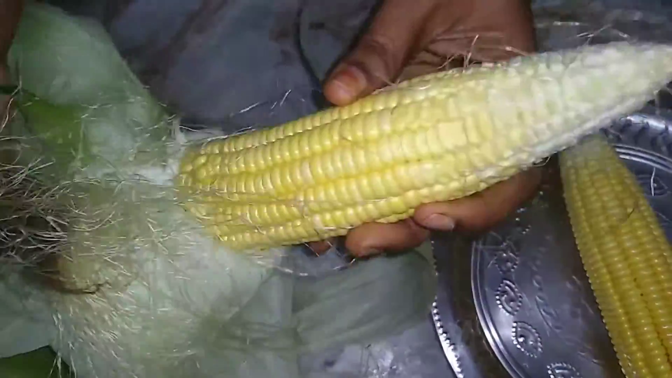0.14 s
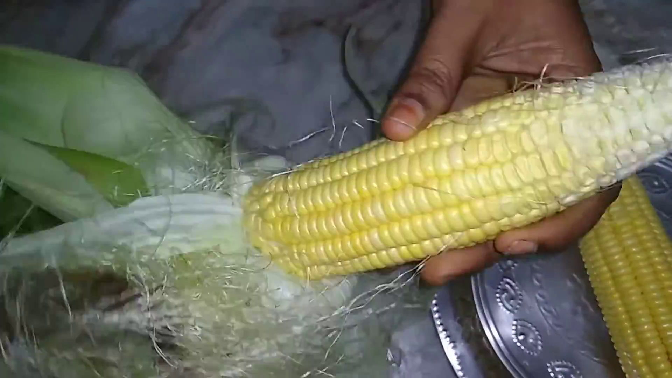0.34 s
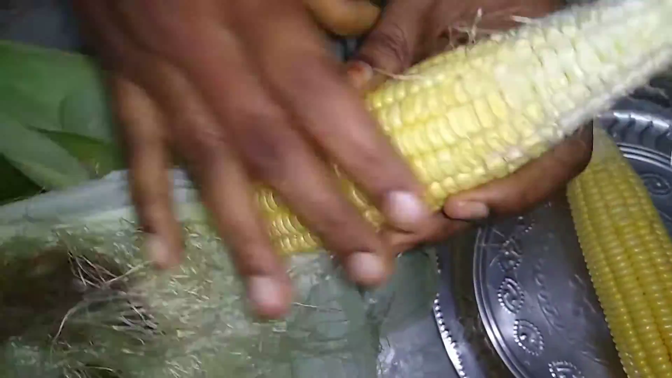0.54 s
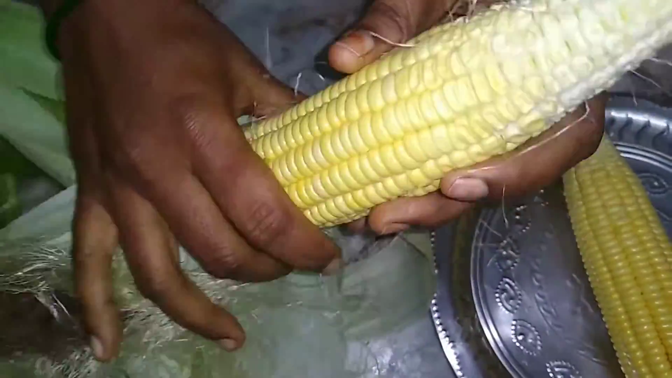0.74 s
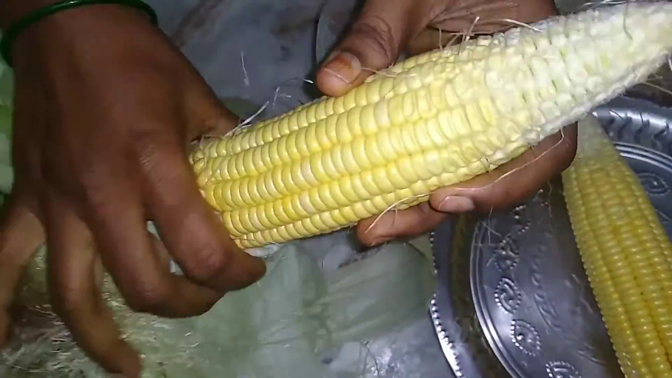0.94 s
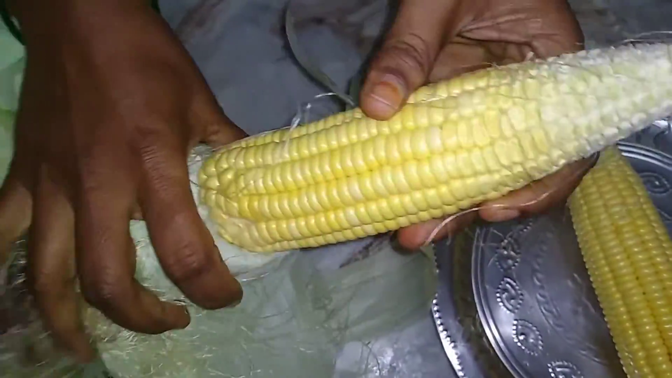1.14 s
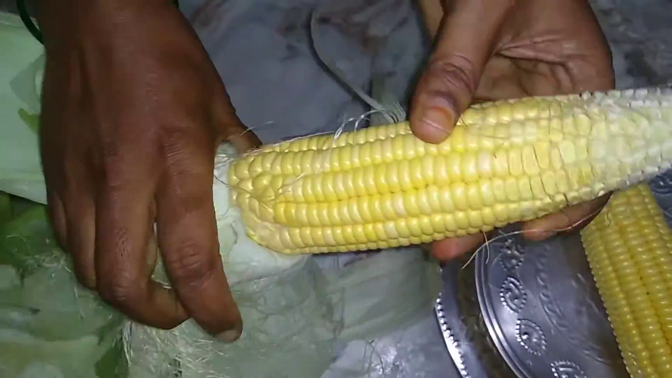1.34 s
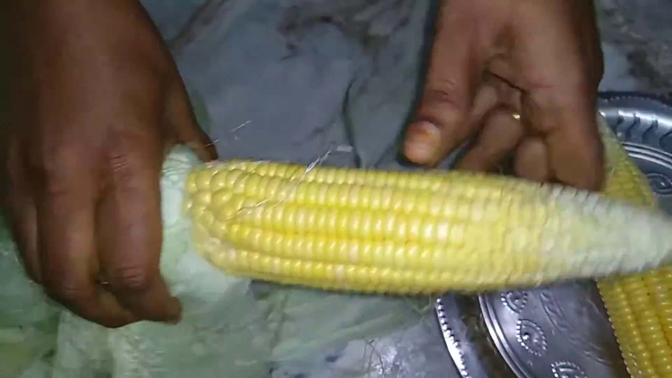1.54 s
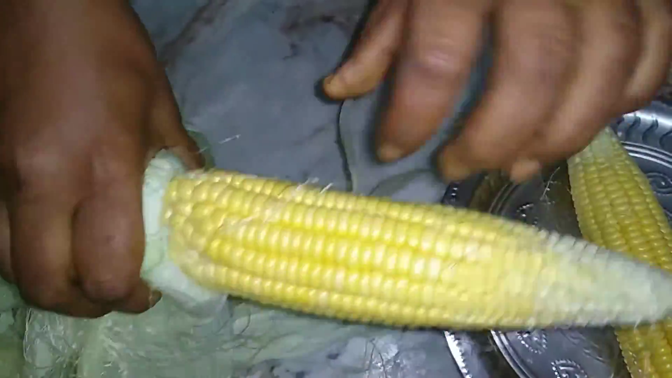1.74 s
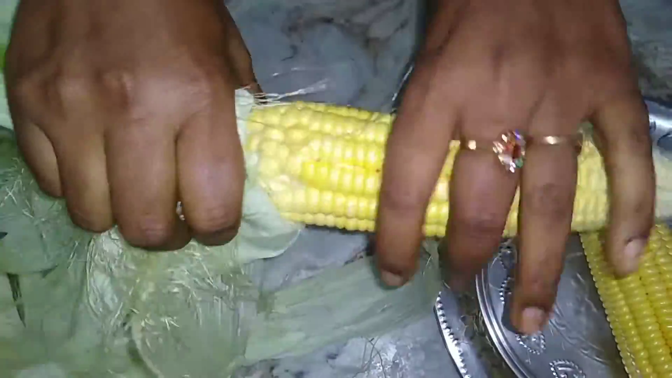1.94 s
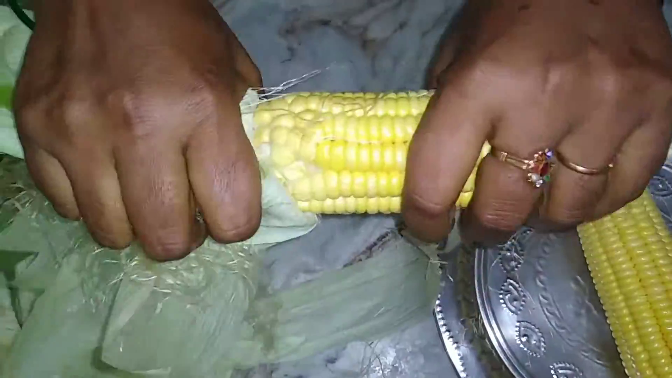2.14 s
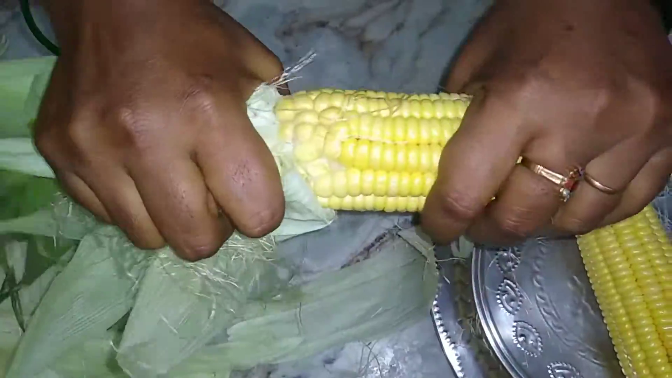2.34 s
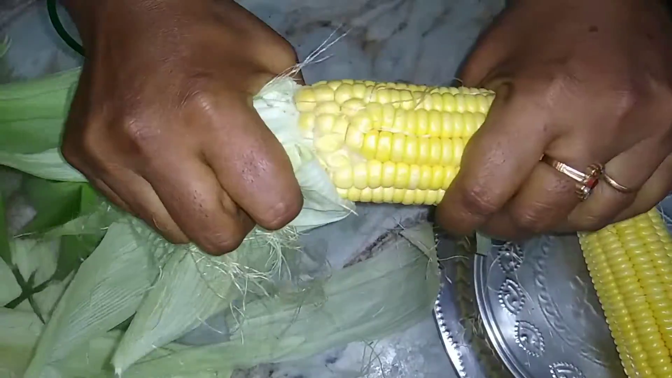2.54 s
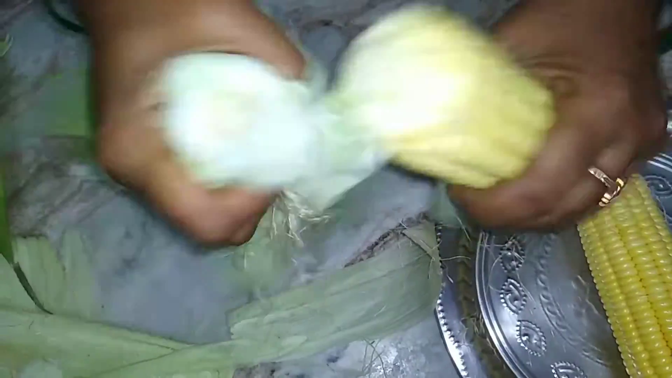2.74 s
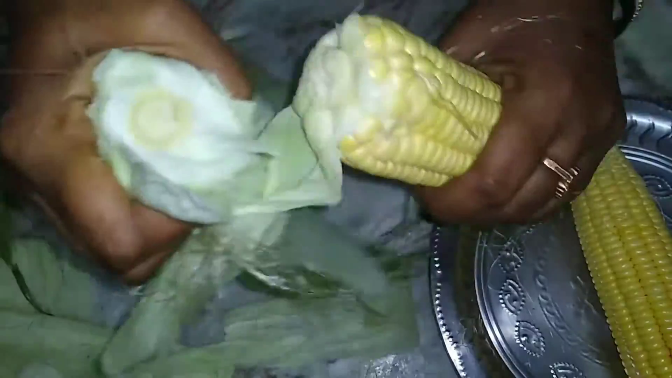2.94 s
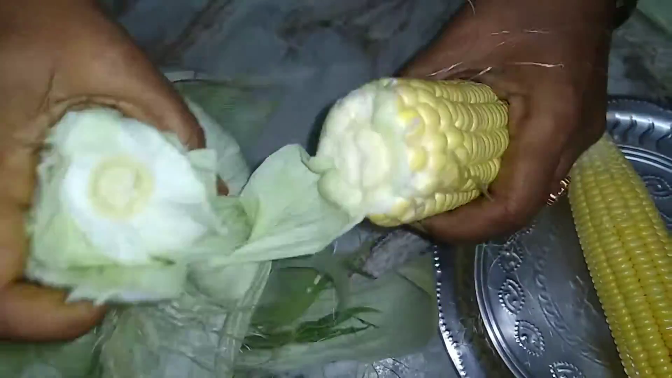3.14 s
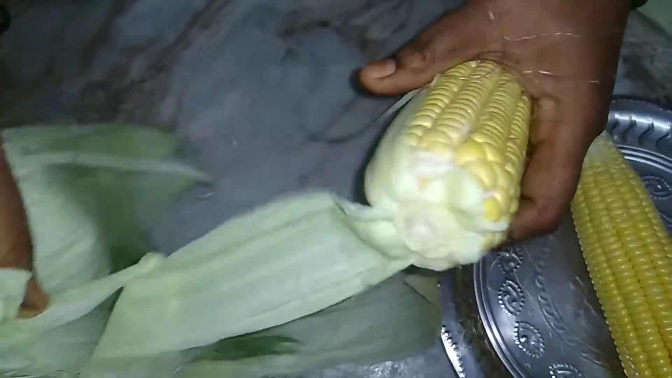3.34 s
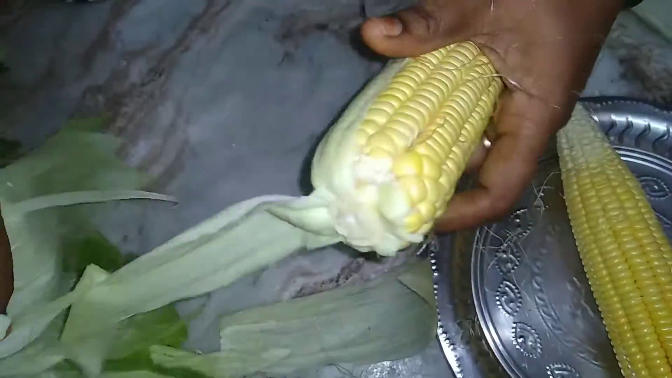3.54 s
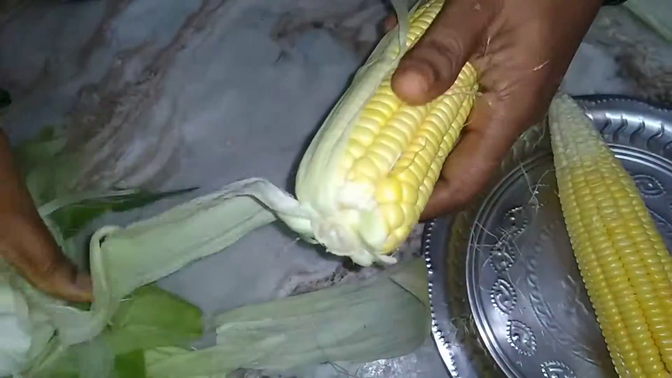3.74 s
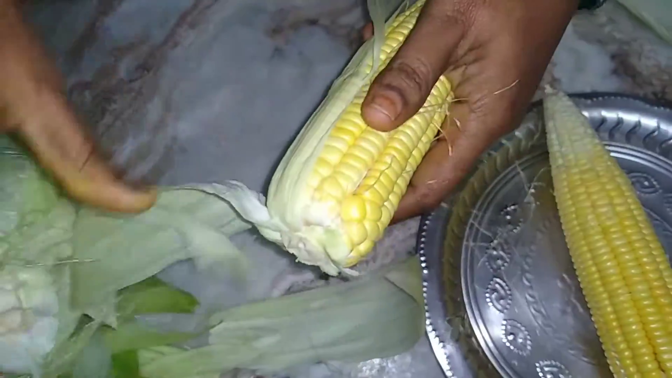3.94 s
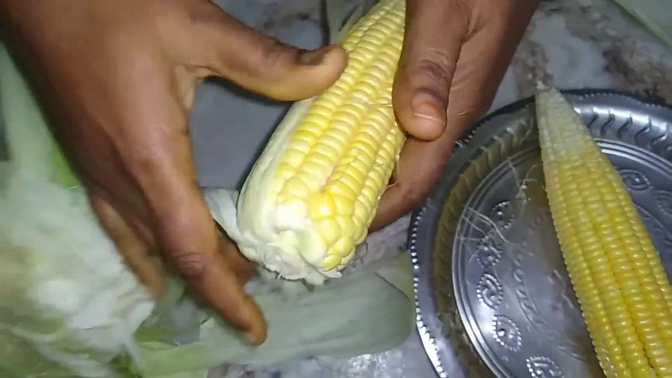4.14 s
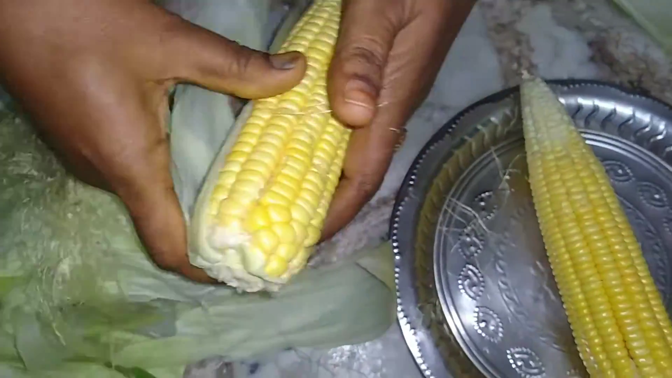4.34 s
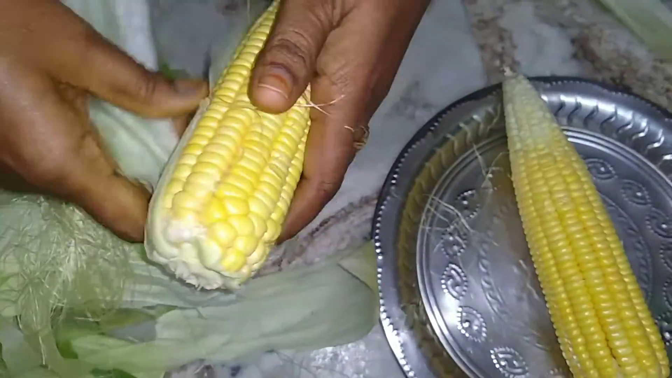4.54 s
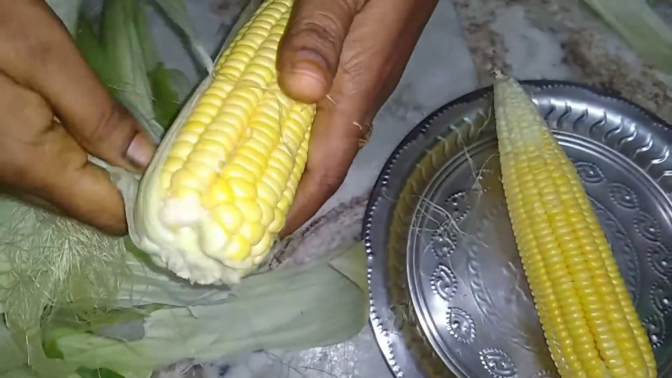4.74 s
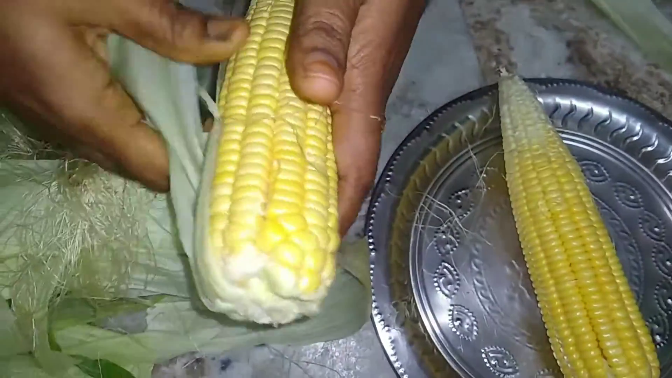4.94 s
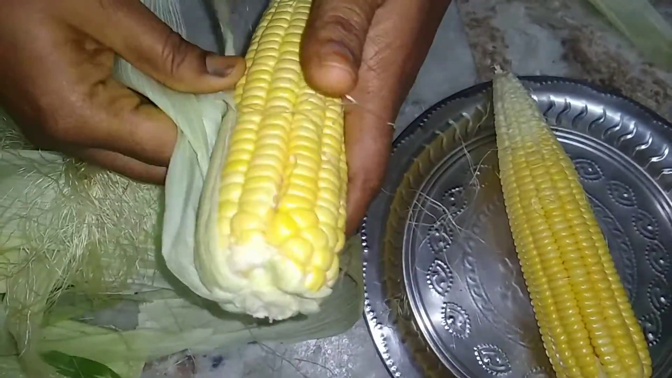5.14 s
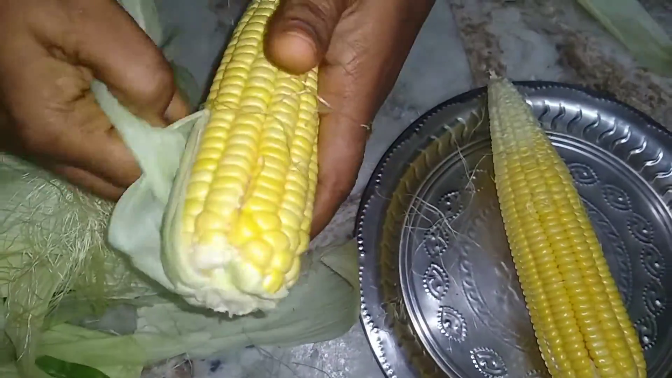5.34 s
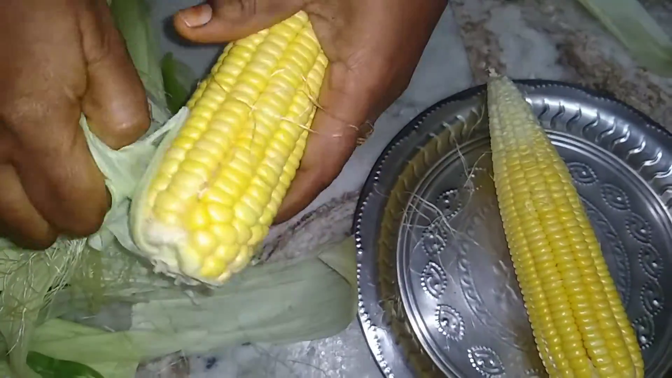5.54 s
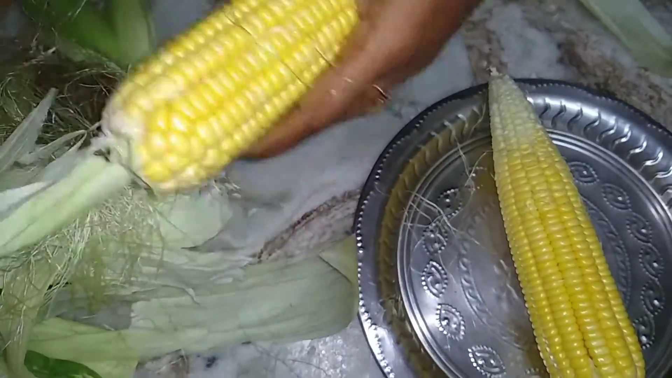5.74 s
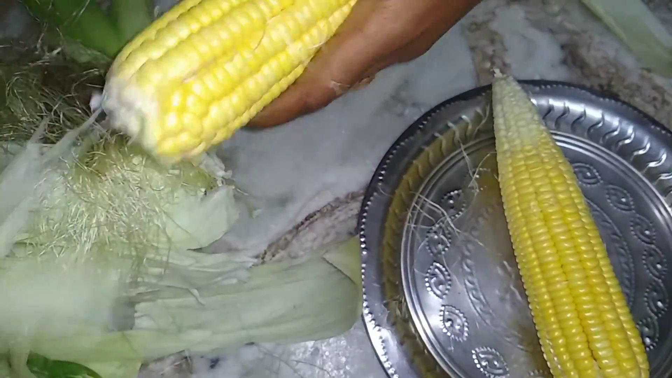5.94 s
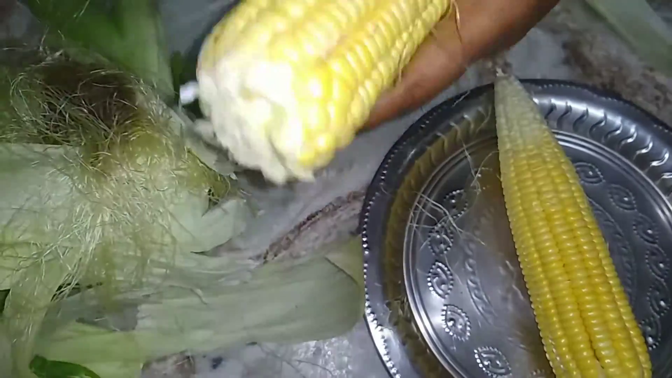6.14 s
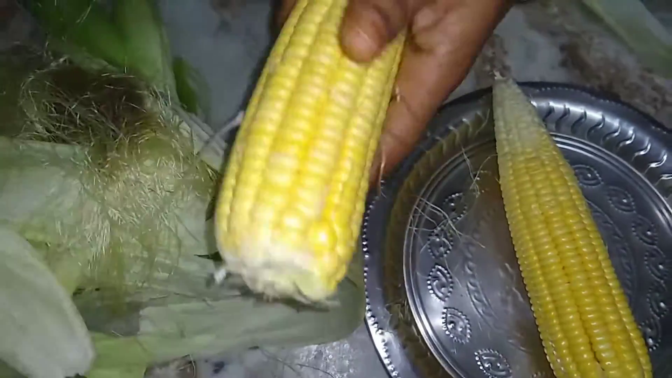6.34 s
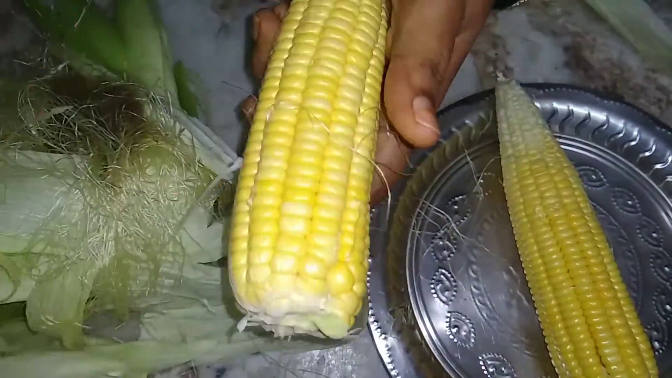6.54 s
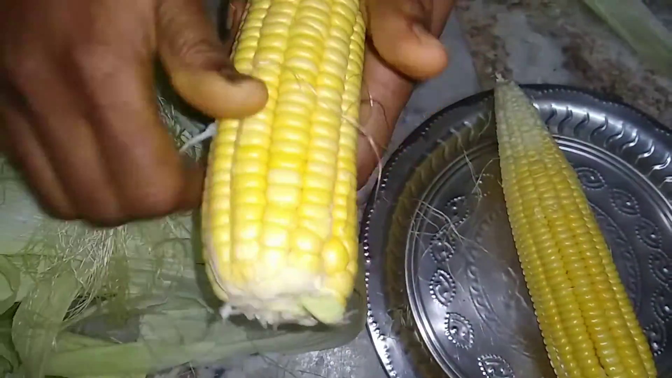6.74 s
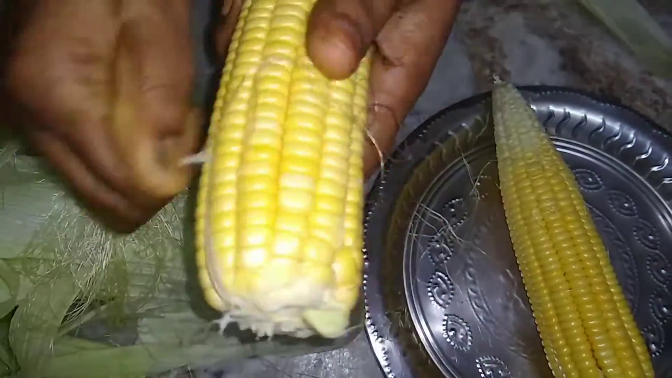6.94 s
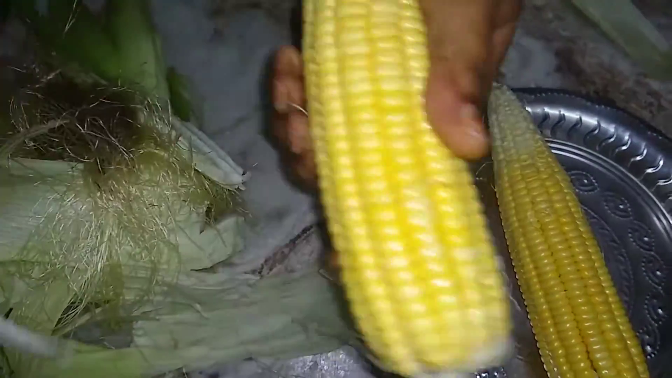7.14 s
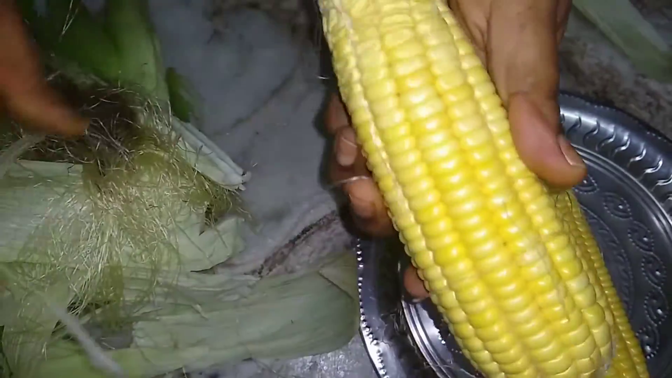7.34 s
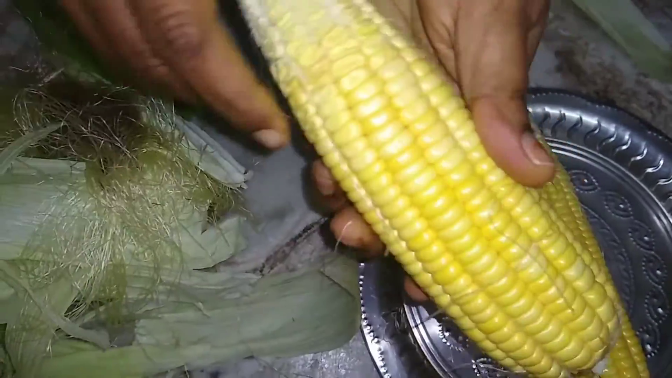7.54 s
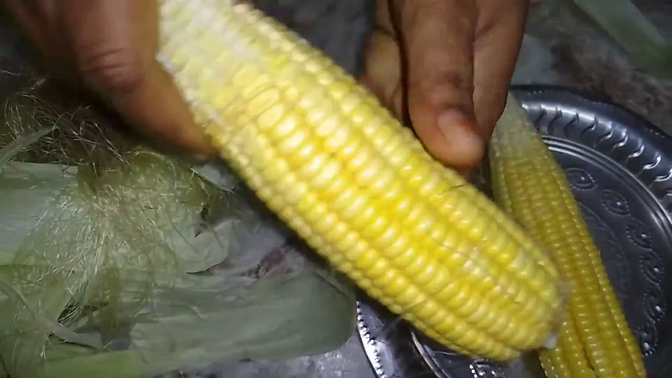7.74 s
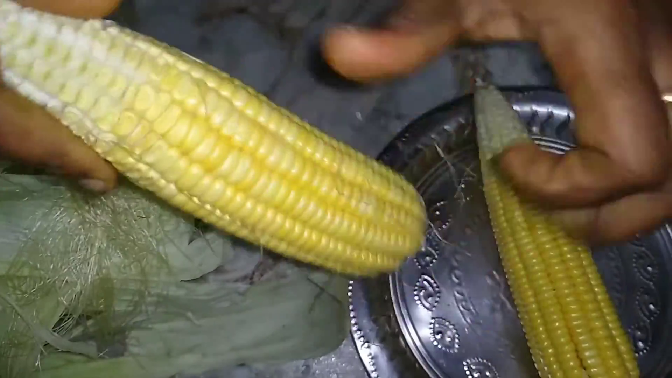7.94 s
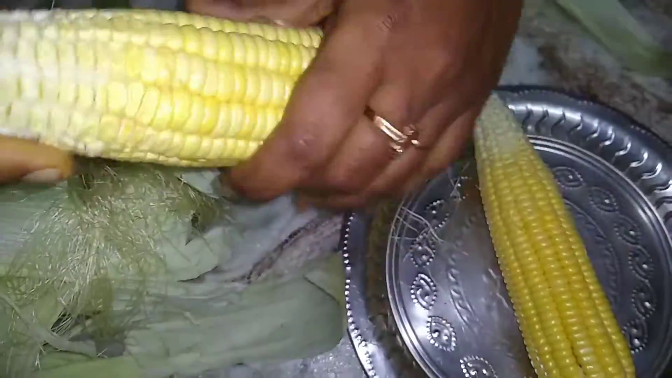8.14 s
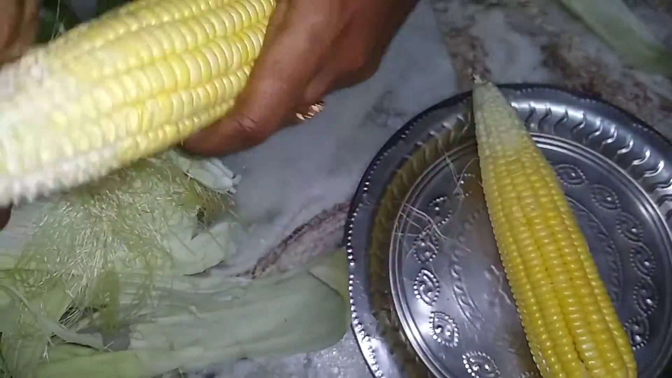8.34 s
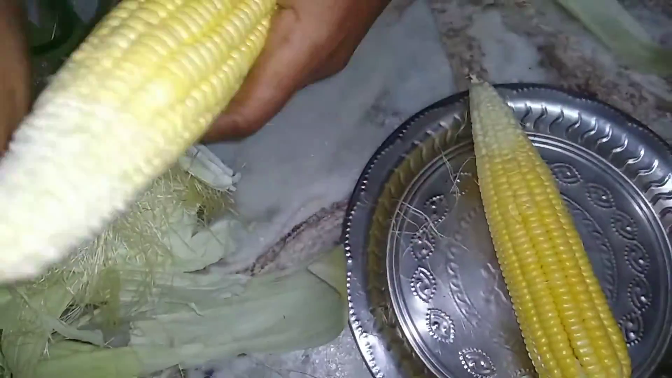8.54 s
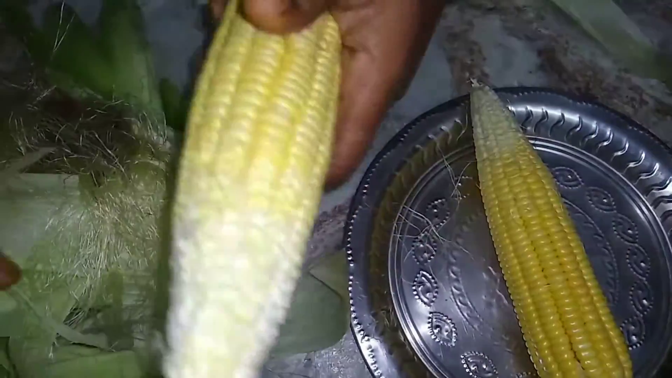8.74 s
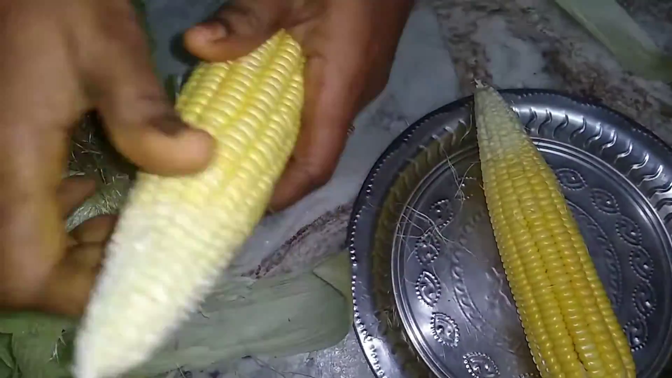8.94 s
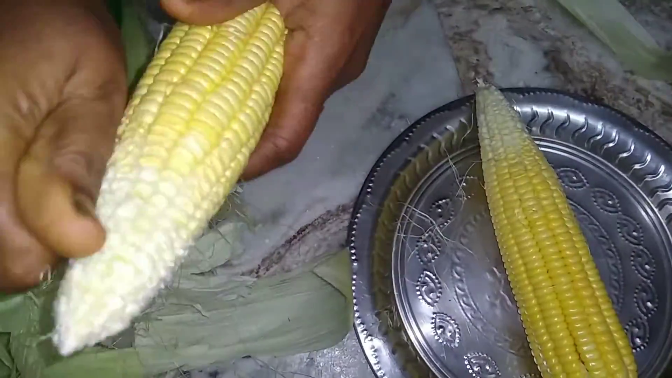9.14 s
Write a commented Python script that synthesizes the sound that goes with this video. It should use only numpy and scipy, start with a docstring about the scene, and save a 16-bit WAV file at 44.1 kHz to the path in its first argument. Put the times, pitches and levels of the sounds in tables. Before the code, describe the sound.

A close, wide stereo recording in a small kitchen with short reflections. It opens with a crisp husk tug at 0 s, then light rustling; faint thin whistles drift from far off around 0.6-0.9 s. At 0.7-1.3 s fibres snap, leaves tug and skin skids with a short hiss. Small snaps follow near 2.0 and 2.5 s, a first crack at 2.6, and the loudest event, a hard stalk crack, at 2.75. Leaf tearing swells around 3.2-3.4, with sharp snaps at 3.55. Handling is soft until about 5.4, when a tiny wet squeak leads into ripping and cracking from 5.6 to 6.0. Afterwards there are only sparse ticks, a faint skid at 7.7 and light rustles at 8.3 and 9.1. Throughout, muffled room air and a distant small engine hum low, the engine slowing from about 4 to 5.8 s, then picking up again; both swell with the rustles.

```python
"""A kitchen counter: hands peel a fresh ear of corn. Husks rustle, rip and squeak (grains and
single breaks through three noise bands, slips as harmonics), the stalk breaks off with a loud crack
and the last leaf is torn away (fractures ringing through resonances).
Far outside a small engine, built from its firing orders, slows and picks up again; a two-port
recorder holds everything down between rustles and widens the stereo picture."""
import sys
import numpy as np
from scipy import signal
from scipy.fft import rfft, irfft, next_fast_len
from scipy.io import wavfile
from scipy.ndimage import uniform_filter1d

SR = 44100
rng = np.random.default_rng(int(sys.argv[2]) if len(sys.argv) > 2 else 0)


def put_to_file(sound):
    """Save the sound as 16-bit audio at rate SR, in the file named by the first command-line argument."""
    columns = np.atleast_2d(sound).T  # one column per channel
    safe = np.clip(columns, -1, 1)
    whole_steps = np.round(safe * 32767)
    wavfile.write(sys.argv[1], SR, whole_steps.astype(np.int16))


N = 409248
TIME = np.arange(N) / SR
HALF_SECOND = TIME[:SR // 2]
# In all tables level_db is relative: trims, room and recorder come after it.


def from_db(db):
    """Decibels to gain."""
    return 10 ** (np.asarray(db) / 20)


def rms_one(x):
    """Scale to rms 1."""
    return x / np.sqrt(np.mean(x ** 2) + 1e-20)


def curve(rows):
    """Draw straight lines through (time, value) points, at every sample."""
    start_s, values = np.transpose(rows)
    return np.interp(TIME, start_s, values)


def at_hz(points, hz):
    """Gain of a spectrum at the given frequencies, interpolated over log frequency."""
    freqs, db = np.transpose(points)
    return from_db(np.interp(np.log(np.maximum(hz, 1)), np.log(freqs), db))


def coloured(x, points):
    """Give a sound a smooth spectrum."""
    length = x.shape[-1]
    size = next_fast_len(length)
    gains = at_hz(points, np.fft.rfftfreq(size, 1 / SR))
    return irfft(rfft(x, size) * gains, size)[..., :length]


def drift(rate, size):
    """Slow chance around zero with unit-spread targets, rate new targets per second."""
    steps = np.arange(size) / SR * rate
    return np.interp(steps, np.arange(4096), rng.standard_normal(4096))


def add(track, s, sound):
    """Mix a sound in at time s."""
    start = max(round(s * SR), 0)
    track[start:start + len(sound)] += sound[:N - start]


def band(x, edges):
    """Causal band-pass."""
    sos = signal.butter(2, np.clip(edges, 20, .47 * SR), "band", fs=SR, output="sos")
    return signal.sosfilt(sos, x + 1e-18)


def resonate(x, modes):
    """Parallel two-pole resonances with alternating signs; a wider mode dies faster."""
    out = 0
    for k, (hz, width_hz, db) in enumerate(modes):
        r = np.exp(-np.pi * width_hz / SR)
        poles = [1, -2 * r * np.cos(2 * np.pi * hz / SR), r * r]
        ringing = (1 - r * r) / 2 * signal.lfilter([1, 0, -1], poles, x + 1e-18)
        out = out + (-1) ** k * from_db(db) * ringing
    return out


def gesture(rise, hold, fade):
    """Envelope that swells, holds, then dies by 40 dB over the fade."""
    t = HALF_SECOND
    swell = np.minimum(t / max(rise, 1e-4), 1) ** 2
    return swell * from_db(-40 * np.maximum(t - rise - hold, 0) / max(fade, 1e-3))


def grains(per_s, spread_db, friction):
    """Half a second of tiny fibre breaks, mostly small and a few large, over smooth friction."""
    size = SR // 2
    born = rng.random(size) < per_s / SR
    heights = from_db(spread_db * np.minimum(rng.exponential(1, size), 4))
    breaks = born * heights * rng.choice([-1, 1], size)
    return rms_one(breaks) + friction * rng.standard_normal(size)


def fracture(splinter_s, splinters):
    """One sharp release, followed by splinter noise that dies by 40 dB in splinter_s."""
    t = TIME[:SR // 20]
    after = rng.standard_normal(len(t)) * from_db(-40 * t / max(splinter_s, 1e-4))
    return (t == 0) + splinters * after / np.linalg.norm(after)


# the three ranges of a husk: low and high edge
DULL_HZ, CRISP_HZ, FINE_HZ = (600, 1780), (2360, 4670), (7900, 18400)


def husk(force, dull_db, fine_db):
    """A leaf radiates in three ranges: dull flap, crisp ribs and fine fibres."""
    thud = rms_one(band(force, (230, 600)))  # soft thud of the hand
    flap = rms_one(band(force, DULL_HZ)) + from_db(-18.5) * thud
    ribs = rms_one(band(force, CRISP_HZ))
    fibres = rms_one(band(force, FINE_HZ))
    return ribs + from_db(dull_db) * flap + from_db(fine_db) * fibres


def rustle(envelope, grain_db, dull_db, fine_db):
    """Fibres tear in uneven clumps."""
    clumps = from_db(3.9 * drift(170, size=SR // 2))
    force = grains(per_s=2200, spread_db=grain_db, friction=0.95) * clumps
    return envelope * husk(force, dull_db, fine_db)


def diffuse(size, shared_below_hz):
    """Noise from all sides at two close ports: alike in the bass, unrelated in the treble."""
    common, apart = rng.standard_normal((2, size))
    high_pass = signal.butter(1, shared_below_hz, "high", fs=SR, output="sos")
    apart = signal.sosfilt(high_pass, apart)
    return rms_one(common + apart * np.array([[1], [-1]]))


# colour of the air: pitch_hz, density_db (dB per Hz, relative)
AIR_COLOUR = [(30, -19), (70, 12.5), (150, 2), (400, 3.5), (1100, -4), (1800, -5.5), (3200, -7),
              (5000, -14), (7000, -24.5), (11000, -26), (15500, -21)]
# slow swells of the air: start_s, level_db
AIR_SWELL = [(0, -50.5), (1.3, -49), (2.5, -50), (3.7, -47.5), (5, -50), (6.3, -51), (9.28, -51.5)]


def room_air():
    """Steady diffuse noise around both ports, slowly rising and falling."""
    noise = rms_one(coloured(diffuse(size=N, shared_below_hz=900), AIR_COLOUR))
    return from_db(curve(AIR_SWELL) - 2.07) * noise


# faint far whistles: start_s, length_s, first_hz, last_hz, level_db
FAR_WHISTLES = [(.55, 0.053, 485, 514, -50), (0.591, 0.18, 571, 568, -53), (0.779, 0.13, 715, 698, -56),
                (8.599, .22, 1305, 1350, -61)]


def whistles(waver, rise_s, fade_s):
    """Thin gliding sine tones from far away."""
    out, t = np.zeros(N), HALF_SECOND
    for s, length, first_hz, last_hz, db in FAR_WHISTLES:
        glide = np.interp(t, [0, length], [first_hz, last_hz])
        hz = glide * (1 + waver * drift(120, size=len(t)))
        tone = np.sin(2 * np.pi * np.cumsum(hz) / SR)
        add(out, s, from_db(db) * gesture(rise_s, length - rise_s, fade_s) * tone)
    return out


# engine speed: start_s, rate_hz (firings per second)
FIRING_RATE = [(0, 29.6), (2.9, 31.4), (3.3, 30), (4.0, 33), (4.5, 24.6), (5.8, 20.3), (7.0, 29.4),
               (7.5, 31.7), (9.28, 32.6)]
# exhaust: start_s, level_db
EXHAUST_LEVEL = [(0, -64.5), (2.6, -65), (3.35, -42), (3.85, -55.5), (4.05, -43.5), (5.7, -54),
                 (6.6, -49.5), (7.1, -49.5), (7.55, -48), (7.85, -57.5), (8.35, -48), (9.28, -58)]
# exhaust as the house passes it on, booming at one room mode: pitch_hz, gain_db
EXHAUST_COLOUR = [(85, -2), (100, -1), (120, -6), (130, -7), (145, -11), (160, 5.5), (178, -6.5), (215, -9),
                  (275, -18.5), (320, -31), (390, -12.5), (450, -22.5)]
# deep hum: start_s, level_db
DEEP_HUM_LEVEL = [(0, -57), (1.4, -58.5), (1.75, -41), (2.2, -50.5), (3.25, -38.5), (3.7, -50.5),
                  (7.2, -47.5), (9.28, -61)]
# the deepest room mode, which the second order sweeps through
HUM_MODE_HZ, HUM_WIDTH_HZ = 60, 12
# slowing by this many firings per s each second, the upper orders lose this much
COAST_SAG_PER_S, COAST_LOSS_DB = 4, 8.5


def engine(level_db, whine_db, waver_db):
    """Firings through walls: wavering orders boom at a room mode, over a hum and a gear whine."""
    firings = curve(FIRING_RATE)
    phase = 2 * np.pi * np.cumsum(firings * (1 + 0.0033 * drift(15, size=N))) / SR
    slowing = np.clip(-np.gradient(firings) * SR / COAST_SAG_PER_S, 0, 1)
    coasting = uniform_filter1d(slowing, size=SR // 4)
    throb = 0
    for k in range(4, 16):
        # reflections shift the strength and timing of each order
        timing = 2 * np.pi * rng.random() + .5 * drift(2.4, size=N)
        order_db = waver_db * drift(3.9, size=N) - COAST_LOSS_DB * coasting * (k > 4)
        boom = at_hz(EXHAUST_COLOUR, k * firings)
        throb = throb + boom * from_db(order_db) * np.cos(k * phase + timing)
    hum = np.cos(2 * phase) / np.hypot(1, 2 * (2 * firings - HUM_MODE_HZ) / HUM_WIDTH_HZ)
    # phase drift blurs the whine
    whine = np.cos(35 * phase + 1.63 * drift(90, size=N))
    whine = from_db(whine_db + 3.5 * drift(15, size=N)) * whine
    exhaust = from_db(curve(EXHAUST_LEVEL) + level_db) * throb
    return exhaust + from_db(curve(DEEP_HUM_LEVEL)) * hum + whine


# colour of the reflections: pitch_hz, gain_db
REFLECTION_COLOUR = [(60, 0), (200, 16), (500, 6), (1200, -6.5), (3500, -8), (7000, -11), (15000, -3.5)]
ROOM_T60_S, ROOM_DB = .19, -4


def kitchen(x):
    """Dense reflections from counter and walls, a little different at each port."""
    t = HALF_SECOND
    decay = from_db(-60 * t / ROOM_T60_S) * (t > .002)
    tail = diffuse(size=len(t), shared_below_hz=900) * decay
    tail = coloured(tail / np.linalg.norm(tail[0]), REFLECTION_COLOUR)
    return from_db(ROOM_DB) * signal.fftconvolve(x[None], tail, axes=1)[:, :N]


def fingering(level_db):
    """Fingers keep shifting on silk and leaves: a faint, patchy crackle."""
    out = np.zeros(N)
    for s in np.arange(0, N / SR - .1, .25):  # half-second pieces overlap by half
        force = grains(per_s=70, spread_db=6.5, friction=.3) * np.hanning(SR // 2)
        piece_db = level_db + 1.1 * rng.standard_normal()
        add(out, s, from_db(piece_db) * husk(force, dull_db=-6.5, fine_db=-4.0))
    return out


# skin skidding with a thin high hiss: start_s, rise_s, hold_s, fade_s, level_db
SKIN_SKIDS = [(0.916, 0.0036, 0.0041, 0.02, -34.5), (1.606, 0.047, 0.01, 0.034, -53),
              (1.683, 0.0037, 0.0067, 0.12, -42.5), (1.74, 0.031, 0.032, 0.026, -40),
              (5.829, .004, 0.02, 0.047, -36), (6.325, 0.0058, 0.018, 0.038, -53),
              (7.703, 0.0076, .018, .07, -43)]
# high resonances that colour the hiss of a skid: pitch_hz, width_hz, gain_db
HISS_MODES = [(4900, 570, -6), (9480, 250, -2), (10900, 190, -2), (15100, 410, 8), (15260, 1030, 1.5)]


def skids():
    """Dense tiny slips of skin make a hiss, coloured by high resonances."""
    out = np.zeros(N)
    for s, rise, hold, fade, db in SKIN_SKIDS:
        slips = grains(per_s=520, spread_db=1.5, friction=0.97)
        hiss = rms_one(resonate(slips, HISS_MODES))
        add(out, s, from_db(db) * gesture(rise, hold, fade) * hiss)
    return out


# wet leaf sticking and slipping: start_s, rise_s, hold_s, fade_s, level_db, first_hz, last_hz (slips per s)
LEAF_SQUEAKS = [(5.445, 0.0048, 0.011, 0.019, -28, 1310, 1200),
                (5.483, 0.0013, 0.0084, 0.017, -32, 1100, 1330)]
# harmonics of a squeak: multiple (of the slip rate), gain_db
LEAF_PARTIALS = [(1, -7), (2, 0), (3, -9), (4, 5), (5, -8.5), (6, -30)]


def squeaks(jitter, glide_s, rasp):
    """Uneven stick-slip gives a short harmonic chirp, with a puff of friction at each slip."""
    out, t = np.zeros(N), HALF_SECOND
    for s, rise, hold, fade, db, first_hz, last_hz in LEAF_SQUEAKS:
        glide = np.interp(t, [0, glide_s], [first_hz, last_hz])
        hz = glide * (1 + jitter * drift(950, size=len(t)))
        phase = 2 * np.pi * np.cumsum(hz) / SR
        tone = rms_one(sum(from_db(gain_db) * np.sin(k * phase) for k, gain_db in LEAF_PARTIALS))
        puffs = rng.standard_normal(len(t)) * (1 + np.cos(phase))
        friction = husk(puffs, dull_db=1, fine_db=1)
        level = from_db(db + 2 * drift(360, size=len(t)))
        add(out, s, level * gesture(rise, hold, fade) * (tone + rasp * friction))
    return out


# the hand draws along a husk: start_s, length_s, crisp level_db, dull_db and fine_db (relative to crisp)
HUSK_PULLS = [(.01, 0.053, -43.5, -1, -8), (0.18, .15, -45, -12.5, -5.5), (0.704, 0.044, -45, -17, -8),
              (1.217, 0.072, -45, -9, -8.5), (2.547, 0.11, -49.5, 0.5, -13.5), (2.792, 0.096, -40.5, 0, 0),
              (2.914, 0.02, -34.5, -8, -4.5), (3.001, 0.058, -47.5, -8, -6.5),
              (3.223, .03, -37.5, -10, -14), (3.245, 0.13, -29, -4, -10.5), (3.294, 0.062, -26, -11, -9),
              (3.682, 0.061, -48, -2, -7.5), (4.202, 0.034, -40.5, -6, -9), (4.75, 0.27, -56.5, -15, -15),
              (5.576, .11, -38, -2, -4), (5.681, 0.075, -33, -8, -10), (5.827, 0.027, -39, -8, 0),
              (5.937, 0.027, -41, -1.5, -3), (6.997, 0.057, -50, -3.5, 0.5), (8.326, 0.064, -50.5, -13, 0),
              (9.074, 0.046, -54.5, -7, -1)]
PULL_RISE_SHARE, PULL_FADE_S, PULL_GRAIN_DB = .25, 0.08, 4
# a leaf lets go at once: start_s, fade_s, crisp level_db, dull_db (relative to crisp)
LEAF_TUGS = [(0.0, .035, -25.5, 3), (0.92, .14, -43, 0), (1.094, .07, -36.5, -7.5), (2.022, .06, -40.5, -3),
             (2.155, .5, -52, -6.5), (2.743, .16, -20.5, -6), (2.82, .35, -38.5, -0.5),
             (3.541, 0.31, -36, -5.5), (5.48, .24, -49.5, -4.5)]
TUG_RISE_S, TUG_HOLD_S, TUG_FINE_DB, TUG_GRAIN_DB = .003, .014, -6.5, -0.5


def rustles():
    """A pull swells and lasts as long as the hand moves; a tug jumps up and dies away."""
    out = np.zeros(N)
    for s, length, db, dull_db, fine_db in HUSK_PULLS:
        rise = PULL_RISE_SHARE * length
        envelope = gesture(rise, length - rise, PULL_FADE_S)
        add(out, s, from_db(db) * rustle(envelope, PULL_GRAIN_DB, dull_db, fine_db))
    for s, fade, db, dull_db in LEAF_TUGS:
        envelope = gesture(TUG_RISE_S, TUG_HOLD_S, fade)
        add(out, s, from_db(db) * rustle(envelope, TUG_GRAIN_DB, dull_db, TUG_FINE_DB))
    return out


# thick fibres snapping: start_s, crisp level_db, dull_db (relative to crisp)
FIBRE_SNAPS = [(0.7143, -51, 11.5), (0.73, -52.5, 8.5), (0.748, -43.5, 8), (0.9219, -36, -5.5),
               (1.0957, -36.5, 4.5), (1.102, -32.5, 1.5), (1.2245, -34, -5), (1.624, -42.5, -2),
               (2.0194, -34.5, 5), (2.0433, -36, -6), (2.1569, -42, -9.5), (2.43, -43.5, -3.5),
               (2.55, -34.5, -6), (2.568, -40, -24), (2.586, -35.5, -9), (2.8037, -39, 16),
               (3.216, -46, 6.5), (3.244, -41, 9.5), (3.267, -37.5, 10.5), (3.514, -40.5, -15),
               (3.5433, -31, -15), (3.549, -25, -13.5), (5.3882, -44.5, -8.5), (5.5420, -42.5, -8),
               (5.9051, -37, -6.5), (5.9538, -27, -0.5), (5.9746, -29, -3.5), (6.3397, -52.5, -4),
               (6.9533, -42.5, -9.5), (7.0689, -39.5, -5), (8.5401, -45.5, -5)]
SNAP_FINE_DB = -4


def snaps(level_db, splinter_s):
    """Thick fibres part one at a time."""
    out = np.zeros(N)
    for s, db, dull_db in FIBRE_SNAPS:
        snap = husk(fracture(splinter_s, splinters=1.1), dull_db, SNAP_FINE_DB)
        add(out, s, from_db(db + level_db) * snap)
    return out


# the stalk gives way: start_s, level_db, splinter_s
STALK_CRACKS = [(2.6136, -16, 0.0026), (2.7462, -13, 0.0071), (2.7471, -7, 0.016)]
# resonances of stalk and cob: pitch_hz, width_hz, gain_db
STALK_MODES = [(1069, 740, 1.5), (1607, 1400, 1), (2600, 480, 2), (4300, 1200, -14.5), (7560, 1300, -15),
               (14500, 1200, -19.5)]
# the last leaf rips off its base: start_s, level_db, splinter_s
LEAF_RIPS = [(5.6926, -16, 0.062), (5.6975, -22, 0.02), (5.7195, -14, 0.0043), (5.7500, -17.5, 0.0046),
             (5.9495, -15.5, 0.0039)]
# resonances of the leaf base: pitch_hz, width_hz, gain_db
LEAF_BASE_MODES = [(2350, 260, -12.5), (3550, 430, 1), (4780, 1620, -9.5), (9400, 2700, -21.5),
                   (14700, 1500, -21.5)]


def cracks(breaks, modes, level_db, splinters):
    """A thick part breaks and rings briefly."""
    out = np.zeros(N)
    for s, db, splinter_s in breaks:
        ring = rms_one(resonate(fracture(splinter_s, splinters), modes))
        add(out, s, from_db(db + level_db) * ring)
    return out


# hand noise at the shaded left port: pitch_hz, gain_db
SHADED_PORT = [(100, 18), (400, 6), (1000, -15.5), (1700, -10.5), (4000, -17.5), (15000, -10.5)]


def scene():
    """The hands are close to the right port; room, air and street reach both."""
    leaves = rustles() + snaps(level_db=-10, splinter_s=0.021) + fingering(level_db=-71)
    stalk = cracks(STALK_CRACKS, STALK_MODES, level_db=-10, splinters=0.65)
    last_leaf = cracks(LEAF_RIPS, LEAF_BASE_MODES, level_db=-12.5, splinters=2.2)
    slips = skids() + squeaks(jitter=0.052, glide_s=0.0133, rasp=0.15)
    hands = leaves + stalk + last_leaf + slips
    direct = np.array([coloured(hands, SHADED_PORT), hands])
    street = engine(level_db=3.5, whine_db=-66.5, waver_db=2.5)
    street = street + whistles(waver=0.017, rise_s=0.012, fade_s=0.1)
    # the street reaches both ports alike, slightly louder at the left
    street = street * from_db([[.4], [-.4]])
    return direct + kitchen(hands) + room_air() + street


# noise suppressor: shut below this treble level, fully open a knee above it
GATE_SHUT_DB, GATE_KNEE_DB, GATE_DEPTH_DB, GATE_WINDOW_S = -69.5, 16, 9.5, 0.018


def suppressor(x):
    """Everything is held down until treble reaches the right port, so air and engine swell with it."""
    window = max(round(GATE_WINDOW_S * SR), 1)
    power = uniform_filter1d(band(x[1], FINE_HZ) ** 2, size=window)
    treble_db = 10 * np.log10(np.abs(power) + 1e-18)
    opening = np.clip((treble_db - GATE_SHUT_DB) / GATE_KNEE_DB, 0, 1)
    opening = uniform_filter1d(opening, size=SR // 100)
    return x * from_db(GATE_DEPTH_DB * (opening - 1))


# cross-feed of the widener: pitch_hz, gain_db
CROSS_FEED = [(80, -0.5), (400, -5), (2200, 3), (4400, -5.5), (7000, -7.5), (10000, -13), (15000, -10.5)]
# left over right: pitch_hz, gain_db
LEFT_BALANCE = [(100, 5), (1100, -1.5), (1650, 1), (3500, -1), (6000, 6), (9500, 8.5), (12000, 2),
                (15000, 1)]
WIDENER_LAG_S, CUTOFF_HZ = 20 / 44100, 15700


def record(dry):
    """Suppress, subtract the other port a moment later to widen, clip peaks, cut rumble and top."""
    ports = suppressor(dry)
    lag = round(WIDENER_LAG_S * SR)
    other = np.pad(ports[::-1], ((0, 0), (lag, 0)))[:, :N]
    left, right = ports - coloured(other, CROSS_FEED)
    wide = np.clip([coloured(left, LEFT_BALANCE), right], -.9, .9)
    rumble_cut = signal.butter(2, 32, "high", fs=SR, output="sos")
    top_cut = signal.ellip(10, .2, 80, CUTOFF_HZ, fs=SR, output="sos")
    return signal.sosfilt(top_cut, signal.sosfilt(rumble_cut, wide))


dry = scene()
out = record(dry)
put_to_file(out)
```